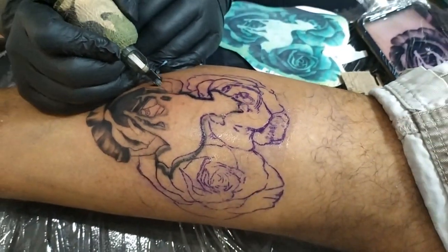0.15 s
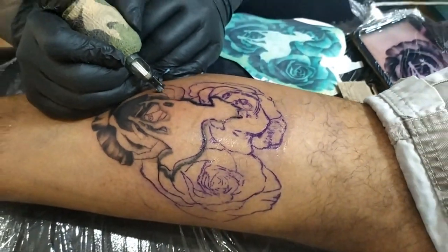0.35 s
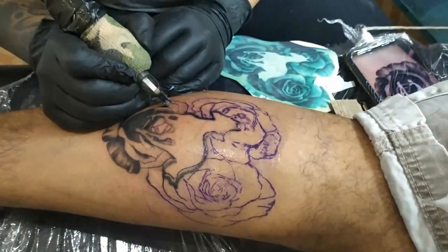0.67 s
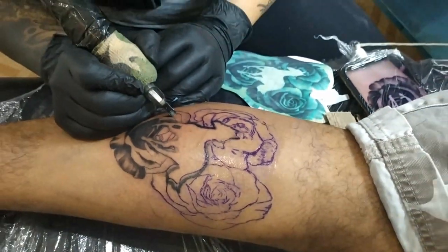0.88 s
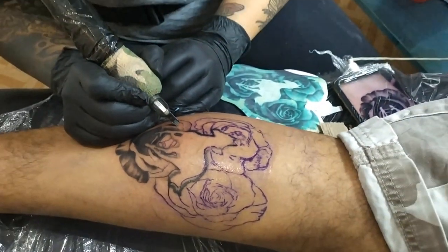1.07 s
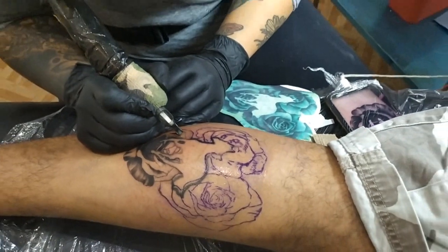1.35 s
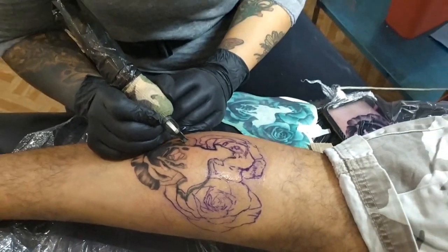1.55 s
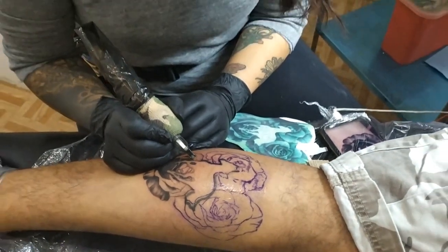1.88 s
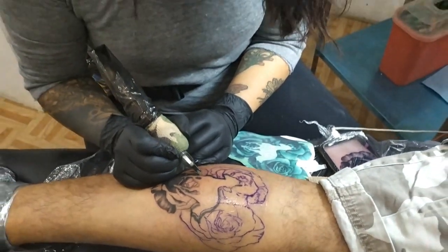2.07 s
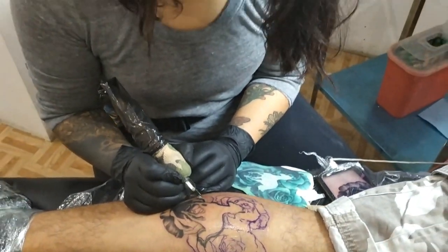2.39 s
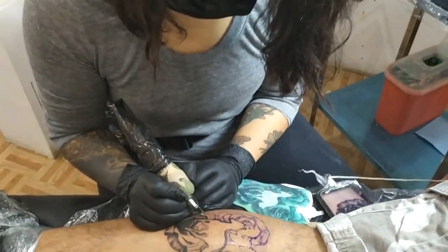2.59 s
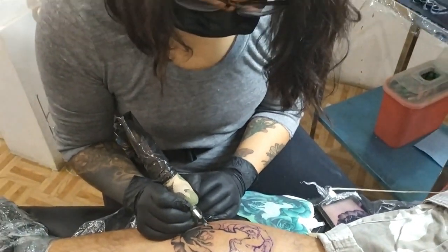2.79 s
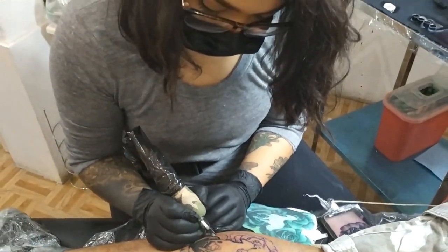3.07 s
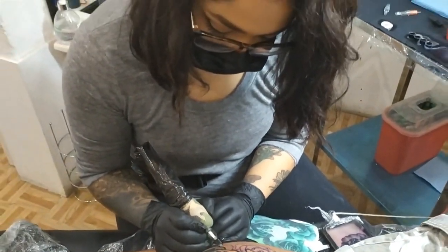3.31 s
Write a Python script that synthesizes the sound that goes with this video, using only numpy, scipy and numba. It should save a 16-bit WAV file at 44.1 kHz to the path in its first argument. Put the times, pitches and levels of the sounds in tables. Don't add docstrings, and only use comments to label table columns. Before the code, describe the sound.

A tattoo pen buzzes without pause, bright and rattly, in a small room over faint low rumble; the hand-held phone slowly draws back, and its case gets dull finger bumps near the middle and end.

```python
import sys
import numpy as np
from scipy import signal
from scipy.io import wavfile
from scipy.ndimage import uniform_filter1d, map_coordinates
from numba import njit

SR = 44100
rng = np.random.default_rng(int(sys.argv[2]) if len(sys.argv) > 2 else 0)


def volts_from_decibels(level):
    exponent = np.asarray(level, float) / 20
    return 10 ** exponent


def generate_wav(sig):
    pcm = np.round(np.clip(np.atleast_2d(sig).T, -1, 1) * 32767).astype(np.int16)
    wavfile.write(sys.argv[1], SR, pcm)


N = 152145
STROKE_HZ, FIRST_STROKE_S = 90.642, .0060
LEFT_RIGHT = np.array([[1], [-1]])


@njit
def svf(x, hz, width_hz):
    y, band, low = np.empty(len(x)), 0., 0.
    g, k = np.tan(np.pi * hz / SR), width_hz / hz
    for i in range(len(x)):
        v = (band + g * (x[i] + 1e-18 - low)) / (1 + g * (g + k))
        band, low, y[i] = 2 * v - band, low + 2 * g * v, k * v
    return y


def ring(x, hz, width_hz):
    once = svf(x, 1. * hz, 1.33 * width_hz)
    return svf(once, 1. * hz, 1.33 * width_hz)


def level(x, db):
    return x * volts_from_decibels(db) / np.sqrt(np.mean(x ** 2))


def walk(rate_hz):
    hold = int(SR / rate_hz)
    steps = np.repeat(rng.standard_normal(N // hold + 1), hold)
    return 1.17 * uniform_filter1d(uniform_filter1d(steps, hold), hold)[:N]


def sample_at(t):
    return np.clip(t * SR, 0, N - 1).astype(int)


def clicks(times):
    at = np.clip(times.ravel() * SR, -8, N + 8) + 16
    near = np.floor(at).astype(int)[:, None] + np.arange(-3, 5)
    gap = near - at[:, None]
    kernel = np.sinc(gap) * np.cos(np.pi * gap / 8) ** 2

    def play(size):
        spread = size.ravel()[:, None] * kernel
        return np.bincount(near.ravel(), spread.ravel(), N + 40)[16:N + 16]
    return play


# time in seconds, level in dB, brightness in dB,
# lean to the left in dB, lateness in ms, tilt of the low ring in dB.
HAND = [(0.0, -36, 3, 3.5, .45, -6), (0.06, -36, 2, 5, 0.439, -6), (.2, -36.5, 3.5, 5, 0.432, -11.5),
        (.5, -35, -0.5, 3, 0.31, -1), (0.8, -35.5, 0, 5, 0.236, -0.5), (1.101, -35, -0.5, 2.5, 0.105, -3),
        (1.349, -36, -0.5, 2.5, 0.024, 3), (1.5, -36, 0, 0.5, -.05, 3), (1.75, -36.5, -2, 1.5, -.15, 0.5),
        (1.95, -37, -0.5, 2.5, -.25, 0), (2.25, -38, -0.5, 3.5, -0.302, -8.5),
        (2.499, -39, -1, 2, -0.17, -5), (2.8, -38.5, -0.5, 1.5, -.1, 1.5), (3.0, -39, 0.5, 1.5, -.05, -3),
        (3.298, -40, -0.5, 3.5, -0.035, -3), (3.45, -39.5, -0.5, 4, -0.0086, -1)]


def hand(t):
    rows = np.array(HAND).T
    return [np.interp(t, rows[0], row) for row in rows[1:]]


def tilt(hz, db):
    return db / 2 * np.sign(hz - 2080) * (1750 < hz < 2450)


# time in seconds, lag in seconds.
PORT_LAG = [(0, 0.00018), (3.45, 0.0001)]


def port_lag(t):
    return np.interp(t, *np.array(PORT_LAG).T)


def paths(start, count=10):
    echo_db, t60_s, drift_s = -10, 0.32, 0.00013
    index = sample_at(start)
    delay = np.sort(rng.uniform(0.000973, .045, count))
    drift = np.array([walk(0.75)[index] for _ in delay]).T
    gain = volts_from_decibels(echo_db - 60 * delay / t60_s) * rng.choice([-1, 1], count)
    return np.c_[0 * start, delay + drift_s * drift], np.r_[1, gain]


# share of a turn, level in dB.
KNOCKS = [
    (0, 1.5),
    (0.258, -13),
    (0.391, -18),
    (0.672, -12.5),
    (0.819, -12.5),
]
# centre in Hz, width in Hz, level in dB, lateness in ms,
# share of brightness, left-right balance in dB.
BODY = [(1640, 740, -12, -0.78, -0.48, 1), (1963, 366, -4, -.5, -1.1, -5.5),
        (2191, 386, -2.5, -0.46, -1.2, 2.5), (2793, 480, -8, -0.3, -0.25, 0.5),
        (3350, 435, -1, -0.203, 0.48, 1.5), (4142, 720, -0.5, .05, 1.2, 2), (4557, 436, -3, .2, 0.8, -8.5),
        (5720, 1300, -14.5, .4, 0.3, 2), (7520, 1670, -8, .65, 1.23, -12.5),
        (8830, 930, -8.5, .7, 0.96, -3.5), (11260, 500, -13.5, 0.26, -0.68, 5)]


def knocks():
    jitter_s, scatter_db, own_db, wander_db = 1.5e-5, .8, 2.1, 1.5
    low_hz, low_lead_s = 2500, 4e-5
    turn = FIRST_STROKE_S + np.arange(-5, N / SR * STROKE_HZ) / STROKE_HZ
    share, knock_db = np.array(KNOCKS).T
    start = (turn[:, None] + share / STROKE_HZ).ravel()
    start = start + jitter_s * rng.standard_normal(len(start))
    loud, bright, lean, late, turned = hand(start)
    start = start + late / 1000
    loud = loud + np.tile(knock_db, len(turn)) + scatter_db * rng.standard_normal(len(start))
    ways = [paths(start), paths(start)]
    left = clicks((start + port_lag(start))[:, None] + ways[0][0])
    right = clicks(start[:, None] + ways[1][0])
    out = np.zeros((2, N))
    for k, (hz, width_hz, ring_db, late_ms, edge, pan_db) in enumerate(BODY):
        wander = wander_db * walk(3.095)[sample_at(start)]
        own = loud + wander + tilt(hz, turned) + ring_db + edge * bright
        own = own + own_db * rng.standard_normal(len(start))
        sign = (-1) ** (k - (hz > 2080))
        for c, (play, side) in enumerate(((left, 1), (right, -1))):
            size = volts_from_decibels(own + side * (pan_db + (1 - edge) * lean) / 2)[:, None] * ways[c][1]
            lead_s = low_lead_s * (hz < low_hz and c == 0)
            shift = round((late_ms / 1000 - lead_s) * SR)
            out[c] += sign * np.roll(ring(play(size), hz, width_hz), shift)
    return out * volts_from_decibels(5.5 + 32.5)


# centre in Hz, width in Hz, level in dB, share of brightness,
# left-right balance in dB.
RATTLE = [(1530, 1170, -12, 0.86, 1), (1871, 216, 0.5, -0.1, 0.5), (2163, 330, -0.5, -0.15, 1),
          (2710, 960, -4, 1, 2.3), (4235, 1740, 1.5, 0.72, -0.5), (5960, 1200, -2.5, 0.25, 0),
          (7860, 3650, -4.5, 0.66, 1.5), (9130, 830, 1, 0.033, 3), (10240, 3150, -6, -0.53, -1),
          (11730, 500, -7, 1, 9)]


def rattle(t):
    rattle_db, pulse_db, grain_db, alike = 6, 0.5, 2.0, 0.33
    loud, bright, lean, late_ms, turned = hand(t)
    phase = (t - FIRST_STROKE_S - late_ms / 1000) * STROKE_HZ % 1
    pulse = volts_from_decibels(pulse_db * 2 * np.exp(-phase / 0.25))

    def grit():
        return pulse * rng.standard_normal(N) * volts_from_decibels(grain_db * rng.exponential(1, N))

    shared = grit()
    lagged = map_coordinates(shared, [(t - port_lag(t)) * SR], order=3, mode="mirror")
    ports = [np.sqrt(alike) * v + np.sqrt(1 - alike) * grit() for v in (lagged, shared)]
    out = np.zeros((2, N))
    for k, (hz, width_hz, db, edge, pan_db) in enumerate(RATTLE):
        flicker = 1.57 * walk(3.97) + 1.02 * walk(29.83)
        band_db = db + tilt(hz, turned) + edge * bright + flicker
        for c, side in enumerate((1, -1)):
            gain = volts_from_decibels(band_db + side * (pan_db + (1 - edge) * lean / 2) / 2)
            out[c] += (-1) ** k * gain * ring(ports[c], hz, width_hz)
    return level(out, rattle_db) * volts_from_decibels(loud)


# multiple of the stroke rate, level in dB.
HUM = [(1, -7.5), (2, -7), (3, -16.5), (4, -17.5), (5, -6), (6, -14), (7, -8.5), (8, -3), (9, -13),
       (10, -27), (11, -7.5), (12, -23), (13, -6.5), (14, -8.5), (15, 2.5), (16, -7), (17, -19), (18, 4.5)]


def hum(t):
    hum_db, waver_db, left_lag_s = -56, 3.4, 0.000097
    heard = np.array([t - left_lag_s, t])
    out = np.zeros((2, N))
    for k, db in HUM:
        tone = np.sin(2 * np.pi * k * STROKE_HZ * heard + k * k)
        out += volts_from_decibels(hum_db + db + waver_db * walk(3.98)) * tone
    return out


# frequency in Hz, density in dB per Hz.
ROOM = [(18, -25), (30, -24), (70, 3), (328, -10), (461, -14), (668, -11.5), (721, -8.5), (881, -22),
        (1200, -15), (1560, -43), (2640, -120)]


def room():
    out, rows = 0, np.array(ROOM).T
    for hz in 36 * 2 ** np.arange(0, 5.3, .5):
        mid, side = (ring(rng.standard_normal(N), hz, hz / 3) for _ in range(2))
        db = np.interp(np.log(hz), np.log(rows[0]), rows[1])
        db = db + 0.58 * walk(2.23) + 1.5 * walk(9.8)
        spread = min(0.13 + hz / 1100.0, 1)
        out = out + volts_from_decibels(db) * (mid + spread * side * LEFT_RIGHT)
    return level(out, -54)


# time in seconds, level in dB.
DRONE = [(0, -68), (.11, -50), (.23, -62), (.35, -50), (.55, -61), (.8, -61), (1.0, -57), (1.2, -54),
         (1.4, -47.5), (1.53, -47), (1.58, -56), (1.7, -49), (2.0, -60), (2.3, -51), (2.6, -61), (2.8, -51),
         (2.92, -66), (3.05, -56), (3.45, -60)]


def outside(t):
    drone_hz, waver_db, traffic_fade_s = 51.2, 2.5, 1.87
    drone = np.sin(2 * np.pi * np.cumsum(drone_hz * (1 + 0.151 * walk(12))) / SR)
    swell_db = np.interp(t, *np.array(DRONE).T) + waver_db * walk(14)
    traffic = level(ring(rng.standard_normal(N), 139.4, 48), -55.5)
    fan = level(ring(rng.standard_normal(N), 470, 15), -71.5)
    return drone * volts_from_decibels(swell_db + 4) + traffic / (1 + (t / traffic_fade_s) ** 4) + fan


# time in seconds, peak in dB, pitch in Hz, ring (60 dB fall) in seconds.
BUMPS = [(1.955, -50, 700, .06), (1.965, -49, 380, .06), (1.978, -45, 400, .05), (1.992, -45, 240, .04),
         (2.010, -32, 1030, .013), (2.011, -40, 520, .015), (2.095, -45, 420, .03), (2.097, -37, 780, .014),
         (2.855, -40, 1100, .012), (2.866, -45, 390, .035), (2.908, -40, 560, .012), (3.003, -39, 580, .02),
         (3.121, -39, 220, .04), (3.170, -32, 290, .045), (3.174, -41, 460, .04), (3.185, -36, 150, .25),
         (3.195, -35, 250, .05)]


def bumps(t):
    scuff_db, scuff_from_hz, scuff_until_s = -3.0, 350, 3.1
    out, noise = np.zeros(N), rng.standard_normal(N)
    for start_s, db, hz, ring_s in BUMPS:
        age = np.clip(t - start_s, 0, None)
        body = np.sin(2 * np.pi * hz * age)
        if hz > scuff_from_hz and start_s < scuff_until_s:
            body = body + volts_from_decibels(scuff_db) * level(svf(noise, 1. * hz, 1. * hz), 0)
        onset = 1 - np.exp(-age * hz * 4.8)
        out += volts_from_decibels(db) * onset * volts_from_decibels(-60 * age / ring_s) * body
    return 1.4 * out


def scene():
    t = np.arange(N) / SR
    small = signal.butter(4, 1473, "high", fs=SR, output="sos")
    machine = signal.sosfilt(small, knocks() + rattle(t))
    return machine + hum(t) + room() + outside(t) + bumps(t)


TOP_HZ = 11850
# start in seconds, length in
# seconds, centre in Hz, width in Hz.
NULLS = [(0.0, 0.45, 9580, 340), (0.01, 0.17, 8420, 180), (0.02, 0.17, 5430, 260), (0.09, 0.15, 3100, 150),
         (0.16, 0.28, 8440, 220), (0.29, 0.15, 6160, 190), (0.37, 0.63, 9880, 290), (0.41, 0.36, 6650, 210),
         (0.54, 0.12, 8440, 200), (0.99, 0.21, 9880, 450), (1.16, 0.32, 3570, 210), (1.2, 0.1, 10770, 280),
         (1.2, 0.14, 9780, 400), (1.31, 0.32, 10660, 190), (1.38, 0.23, 9690, 260), (1.46, 0.13, 2650, 330),
         (1.51, 0.16, 6740, 230), (1.61, 0.22, 2690, 260), (1.64, 0.3, 9800, 270), (1.69, 0.33, 4870, 240),
         (1.75, 0.21, 5380, 230), (1.86, 0.23, 3340, 270), (1.91, 0.12, 6680, 170), (1.99, 0.17, 9500, 200),
         (2.03, 0.19, 11410, 240), (2.12, 0.08, 3420, 430), (2.19, 0.2, 6270, 160), (2.2, 0.12, 11460, 190),
         (2.29, 0.26, 5560, 180), (2.29, 0.41, 6370, 280), (2.3, 0.17, 11710, 140), (2.3, 0.07, 3830, 450),
         (2.32, 0.23, 2450, 120), (2.35, 0.18, 5100, 200), (2.53, 0.14, 5020, 230),
         (2.55, 0.31, 10340, 190), (2.57, 0.23, 11690, 190), (2.69, 0.19, 5080, 370),
         (2.73, 0.37, 6680, 320), (2.98, 0.12, 10490, 260), (3.02, 0.12, 3620, 240),
         (3.06, 0.24, 10250, 200), (3.17, 0.26, 3810, 250), (3.27, 0.14, 5020, 180),
         (3.36, 0.11, 10120, 190)]


def gate(x):
    share, from_hz, depth_db, memory, null_pull = .125, 2350, -60, .9, .9
    edge_hz, edge_from_s, edge_pull = 11450, 1.55, .35
    hz, when, spec = signal.stft(x, SR, nperseg=1024)
    power = uniform_filter1d(np.abs(spec) ** 2, size=4, axis=2) + 1e-20
    near = uniform_filter1d(power, size=4, axis=1)
    around = uniform_filter1d(power, size=41, axis=1)
    dip = np.log(near / around)
    dip = dip - memory * uniform_filter1d(dip, size=90, axis=2)
    for start_s, length_s, at_hz, width_hz in NULLS:
        during = (when > start_s) & (when < start_s + length_s)
        dip[0, abs(hz - at_hz) < width_hz / 2] -= null_pull * during
    dip[:, hz > edge_hz] -= edge_pull * (when > edge_from_s)
    band = (hz > from_hz) & (hz < TOP_HZ)
    weak = (dip < np.quantile(dip[:, band], share)) & band[:, None]
    weak = uniform_filter1d(1. * weak, size=3, axis=1) > 0
    return signal.istft(spec * np.where(weak, volts_from_decibels(depth_db), 1), SR)[1][:, :N]


def low_pass(x):
    return signal.sosfilt(signal.butter(12, 13210, fs=SR, output="sos"), x)


def record(dry):
    turn = np.array([[1, 0.98], [1, -0.95]])
    gated = turn @ gate(turn @ dry / 2)
    top_cut = signal.ellip(12, .3, 80, TOP_HZ, fs=SR, output="sos")
    mix = signal.sosfilt(top_cut, gated)
    return low_pass(mix)


dry = scene()
out = record(dry)
generate_wav(out)
```